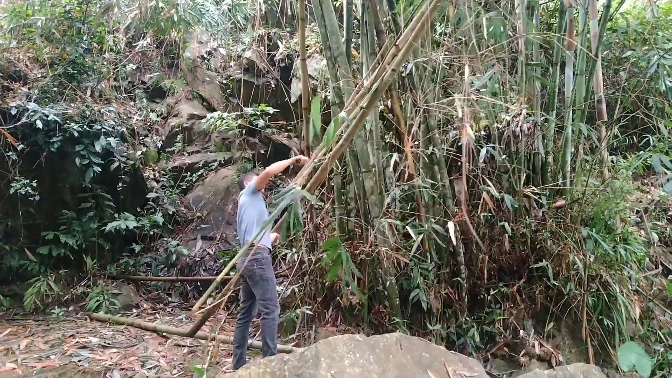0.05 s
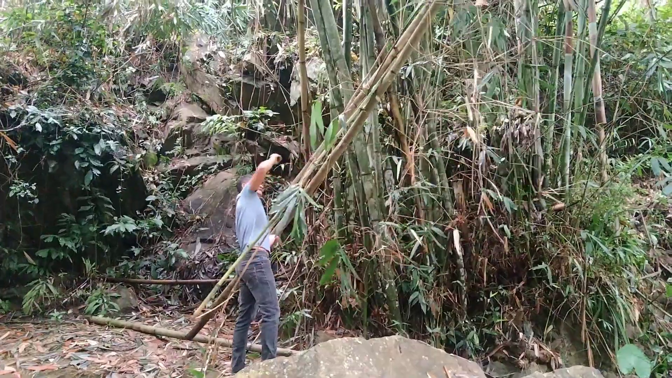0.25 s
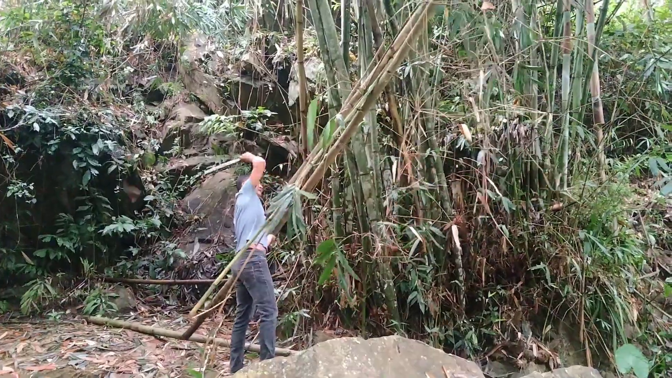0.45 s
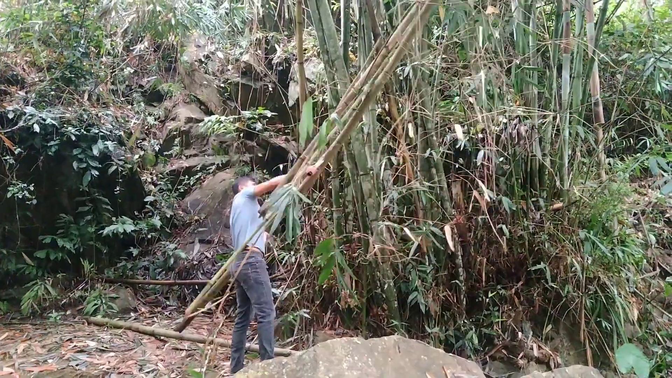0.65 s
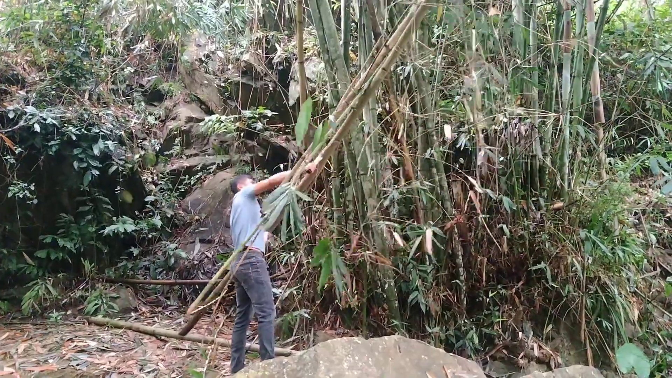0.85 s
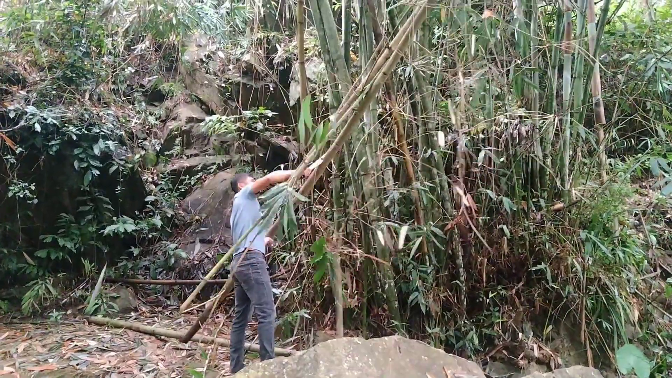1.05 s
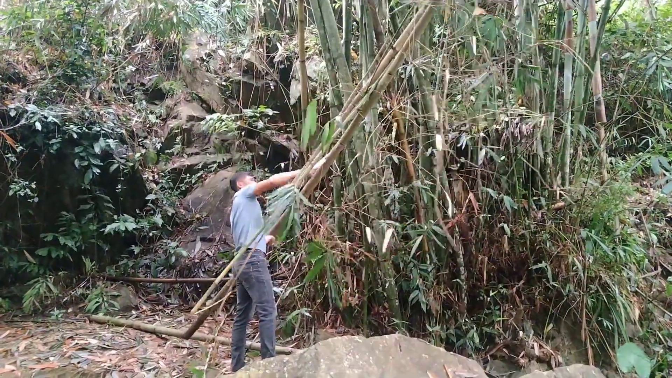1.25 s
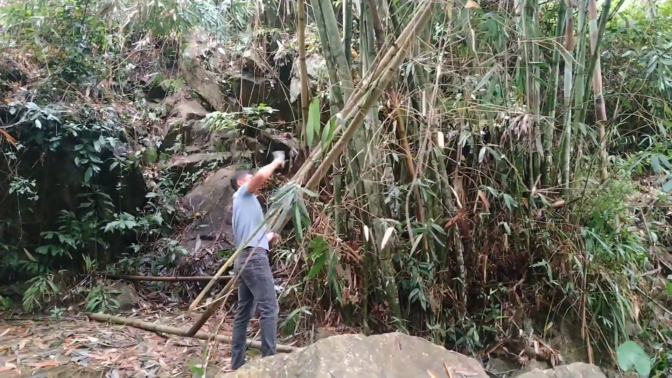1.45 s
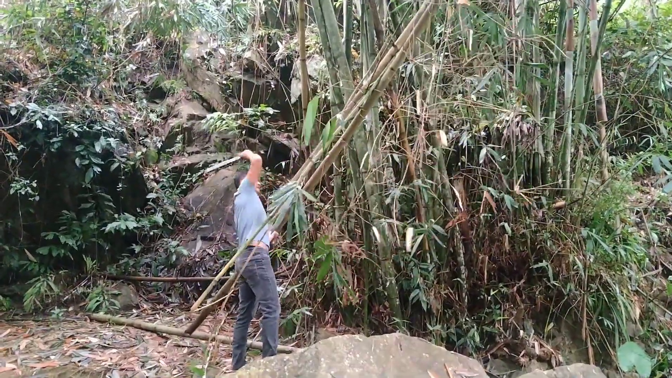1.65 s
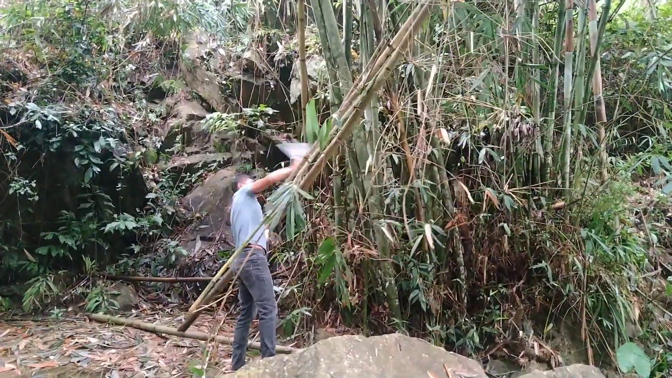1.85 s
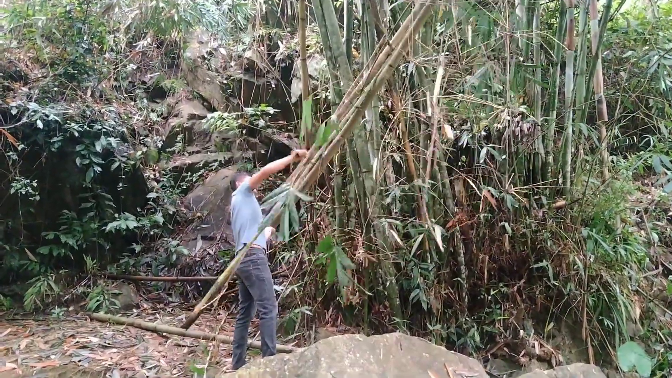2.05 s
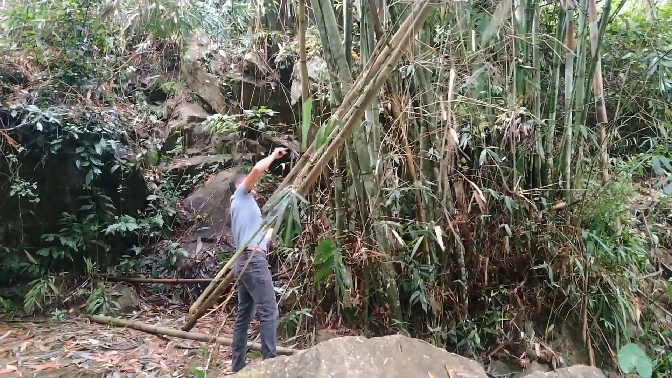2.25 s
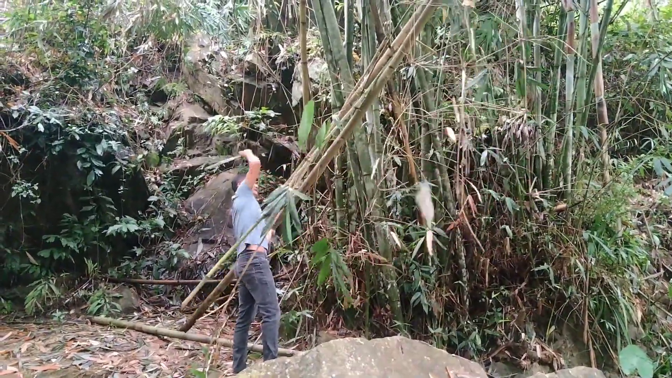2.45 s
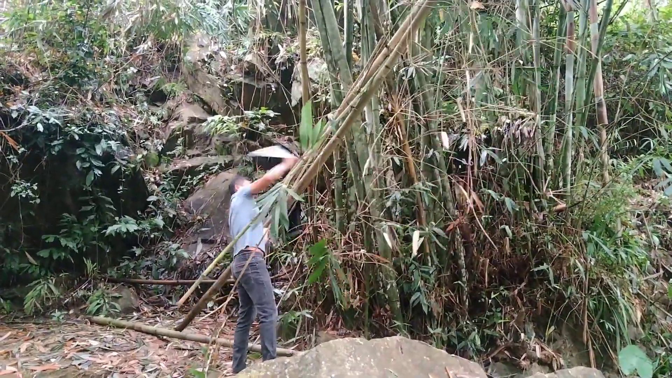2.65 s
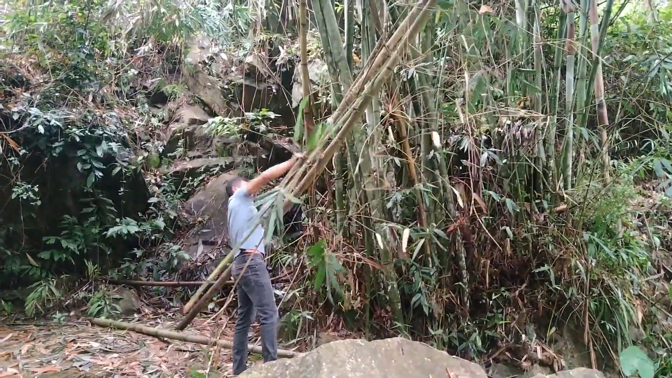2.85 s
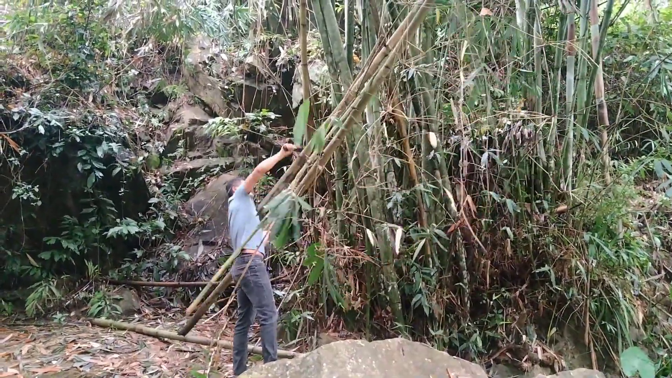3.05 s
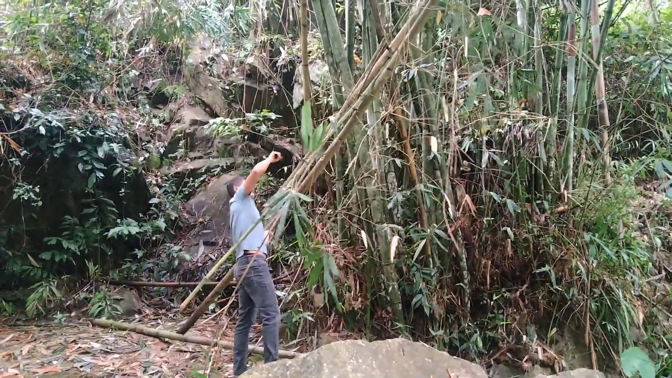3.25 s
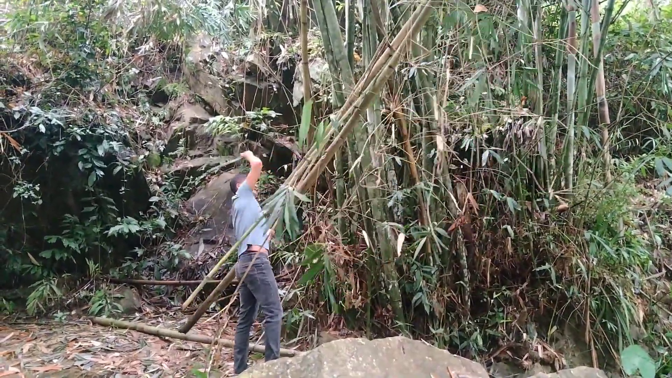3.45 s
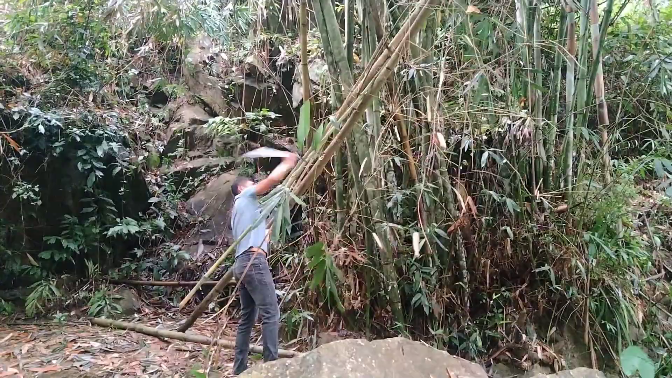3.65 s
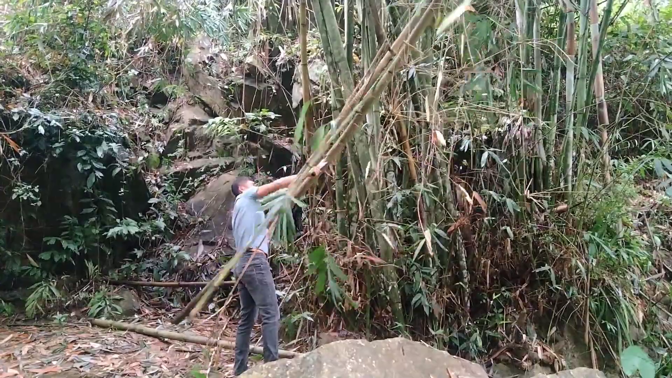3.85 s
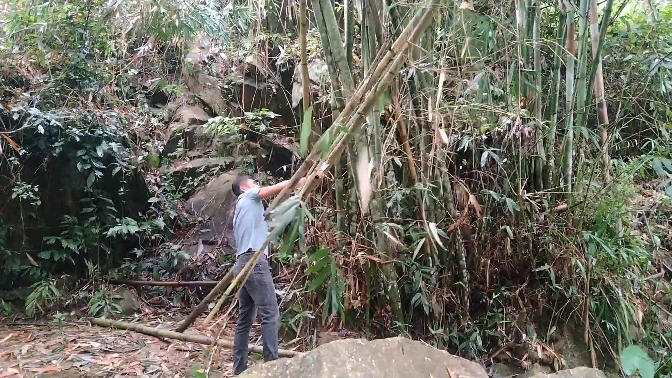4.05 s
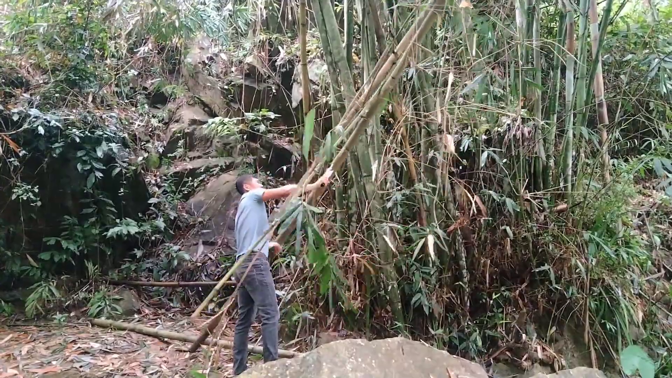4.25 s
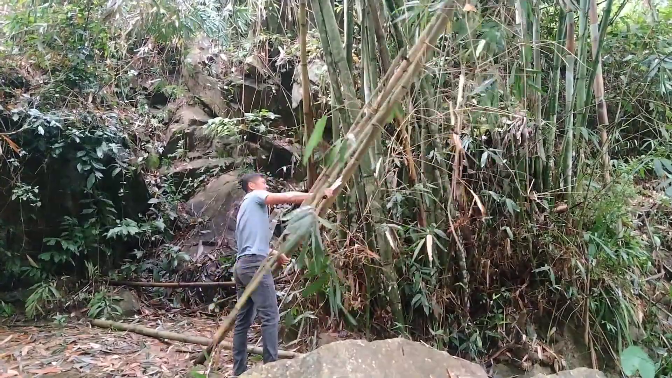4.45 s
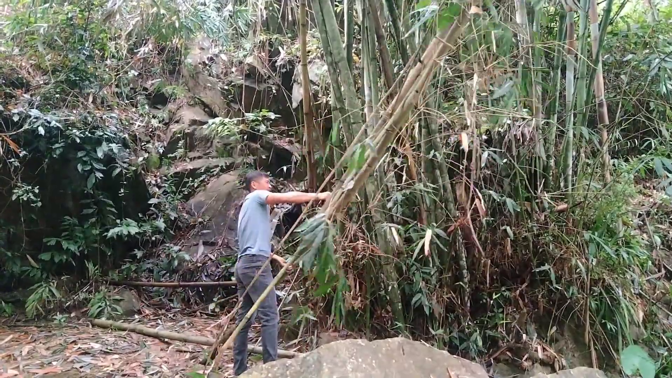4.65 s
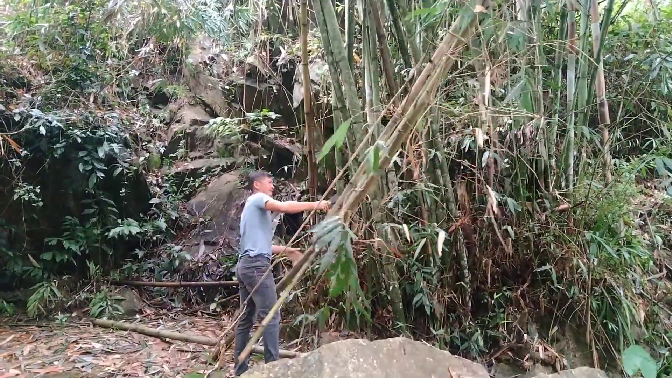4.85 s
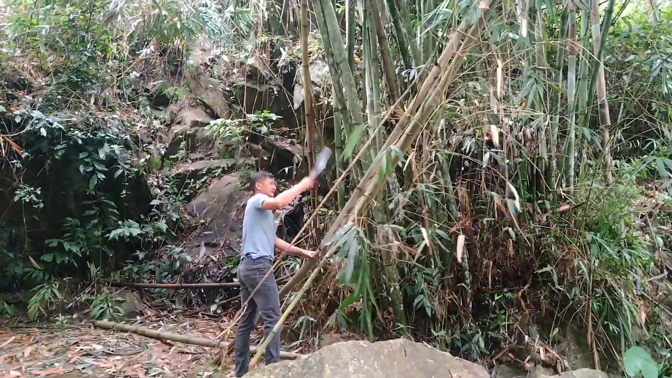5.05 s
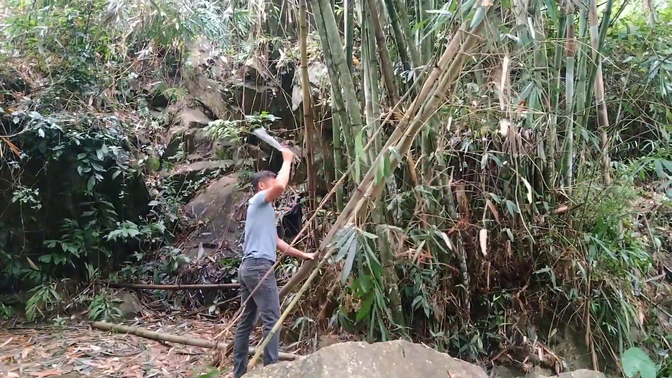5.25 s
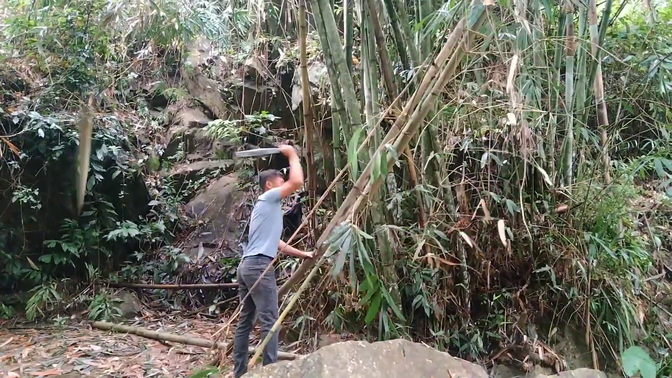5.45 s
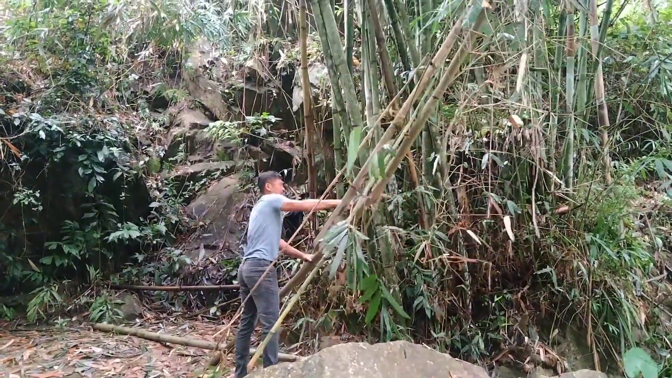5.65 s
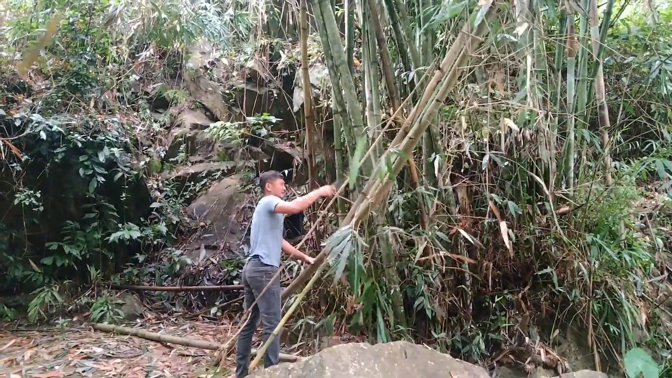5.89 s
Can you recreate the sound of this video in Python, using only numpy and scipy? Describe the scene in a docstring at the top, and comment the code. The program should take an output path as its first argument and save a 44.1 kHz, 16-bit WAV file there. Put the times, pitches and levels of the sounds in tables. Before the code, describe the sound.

A stream runs steadily and quietly throughout, a soft rush with tiny rising bubble tones. At about 0.8 s a machete bites a leaning bamboo pole: a sharp, dry crack of splitting fibres, a brief hollow woody ring, faint leaf crackle and a soft rebound against neighbouring poles. Loose canes knock lightly at 1.1 s. A second stroke at 2.0 s is shorter and higher in pitch, with a dull low thud and stronger leaf rustle. A fuller, knocking chop lands at 2.8 s. Two light steel clinks with tiny scrapes come near 3.4 s, then a brighter, thinner chop at 3.9 s. From 4.3 to 5.0 s poles rub and bump faintly. At 5.7 s two strokes fall almost together, a hollow double crack with rustling leaves. Short scattered echoes return from rock and grove, heard through a small outdoor microphone.

```python
"""A stream runs throughout: filtered noise for the rush, short rising tones for the bubbles.
From 0.8 s a machete chops a leaning bamboo pole: noise snaps for the splitting fibres, fading tones for the
hollow cane. Crackling leaves follow each stroke, then the pole swings back against its neighbours. Loose poles
knock and rub from 1.1 s, one stroke at 2 s has a dull thud, and the blade clinks twice near 3.4 s.
A rock face and the grove throw back the sounds of cane and steel."""
import sys
import numpy as np
from scipy import signal
from scipy.fft import rfft, irfft, next_fast_len
from scipy.io import wavfile
from scipy.ndimage import map_coordinates

SR = 44100
rng = np.random.default_rng(int(sys.argv[2]) if len(sys.argv) > 2 else 0)


def persist_wave(psi):
    """Save psi, clipped to +-1, as 16-bit WAV."""
    counts = np.round(np.clip(psi, -1, 1) * 32767).astype(np.int16)
    wavfile.write(sys.argv[1], SR, np.atleast_2d(counts).T)


N = 261072
T = np.arange(SR) / SR  # time within one event, which lasts at most 1 s


def amp(db):
    """Turn decibels into a gain."""
    return 10 ** (np.asarray(db) / 20)


def unit(x):
    """Scale to an rms of 1."""
    return x / np.sqrt(np.mean(x ** 2) + 1e-20)


def burst(x):
    """Scale to the energy of 50 ms of sound at an rms of 1."""
    return x * np.sqrt(SR / 20 / (np.sum(x ** 2) + 1e-20))


def along(points, hz):
    """Read a curve of (pitch_hz, value) points, with pitch on a log axis."""
    point_hz, value = np.transpose(points)
    return np.interp(np.log(hz + 1), np.log(point_hz), value)


def coloured(x, points):
    """Filter with the gains of (pitch_hz, gain_db) points, without any sound before its cause."""
    size = 2 * next_fast_len(len(x) // 2 + 4096)
    gain = amp(along(points, np.fft.rfftfreq(size, 1 / SR)))
    # Folding the cepstrum (the spectrum of the log gain) forward in time gives a minimum-phase filter.
    cepstrum = irfft(np.log(gain), size)
    cepstrum[1:size // 2] *= 2
    cepstrum[size // 2 + 1:] = 0
    response = np.exp(rfft(cepstrum))
    return irfft(rfft(x, size) * response, size)[:len(x)]


def wobble(rate):
    """Draw a smooth random curve with `rate` random points a second."""
    knots = rng.standard_normal(int(N * rate / SR) + 4)
    return map_coordinates(knots, [np.arange(N) * rate / SR])


def add(track, start_s, x):
    """Mix x into the track from start_s, cutting it at the track's end."""
    part = track[round(start_s * SR):][:len(x)]
    part += x[:len(part)]


def snaps(rate, hiss):
    """Tiny snaps of random size, about `rate` a second, plus a share of fine friction noise."""
    sparse = (rng.random(SR) < rate / SR) * rng.standard_normal(SR)
    return unit(unit(sparse) + hiss * rng.standard_normal(SR))


def ring(modes, pitch, weight, attack):
    """A struck body sounds several fading tones (modes), each with its own strength."""
    hz, db, t60 = np.transpose(modes)[:, :, None]
    phase = 2 * np.pi * (hz * pitch * T + rng.random(hz.shape))
    tones = amp(db - 60 * T / t60) * np.sin(phase)
    return burst(weight @ tones * (1 - np.exp(-T / attack)))


# how long the grove's echoes last: pitch_hz [Hz], time to fade by 60 dB t60_s [s]
GROVE_FADE = [(100, 0.45), (350, 0.21), (1400, 0.2), (5000, 0.4), (9000, 0.44), (15000, 0.056)]


def outdoors(x, near_db=-4, near_decay=0.013, rock_db=-7, rock_delay=0.027, rock_spread=0.021,
             grove_db=-5, far_db=-18, far_t60=1.8):
    """Add scatter from nearby poles, a smeared echo off the rock face and the tail of the grove."""
    hz, t, spectrum = signal.stft(rng.standard_normal(SR), SR, nperseg=256)
    near_fade = amp(-60 * t / along(GROVE_FADE, hz)[:, None])
    far_fade = amp(far_db - 60 * t / far_t60)
    tail = signal.istft(spectrum * (near_fade + far_fade), SR, nperseg=256)[1][:SR]
    grove = tail * (1 - np.exp(-T / 0.013))
    near = snaps(1500, 0.3) * np.exp(-T / near_decay)
    rock_shape = (T > rock_delay) * np.exp(-np.abs(T - rock_delay) / rock_spread)
    rock = snaps(1200, 0.46) * rock_shape
    echoes = [(near_db, near), (rock_db, rock), (grove_db, grove)]
    answer = sum(amp(db) * echo / np.linalg.norm(echo) for db, echo in echoes)
    return x + signal.fftconvolve(x, answer)[:SR]


def bubbles(count, centre_hz, spread, cycles, size_db):
    """Small bubbles: fading tones that rise in pitch as they reach the surface."""
    t = T[:SR // 40]  # each tone lasts at most 25 ms
    start = rng.integers(0, N, (count, 1))
    hz = np.clip(centre_hz * np.exp(spread * rng.standard_normal((count, 1))), 300, 9000)
    age = t * hz / cycles
    size = amp(size_db * rng.exponential(size=(count, 1)).clip(0, 4))
    envelope = size * np.exp(-age) * (1 - np.exp(-8 * age))
    rise = 1 + 0.0462 * np.minimum(age, 4)
    grains = envelope * np.sin(2 * np.pi * hz * t * rise)
    position = start + np.arange(len(t))
    return unit(np.bincount(position.ravel(), grains.ravel())[:N])


# tone colour of the rushing water: pitch_hz [Hz], level_db [dB per Hz]
WATER_COLOUR = [(25, -17), (60, -19.5), (105, -11), (200, -7), (700, -6.5), (1050, -7), (1420, -.5),
                (1750, -5), (2500, 1.5), (3500, -8.5), (5300, -14.5), (7400, -12), (11000, -37.5),
                (14000, -11.5)]
FLOW_DB = -40.0  # level of the rush


def stream():
    """Rushing water is filtered noise with slight wavering, under a babble of many bubbles."""
    rush = unit(coloured(rng.standard_normal(N), WATER_COLOUR)) * amp(0.63 * wobble(12))
    babble = bubbles(count=4000, centre_hz=1986, spread=0.3136, cycles=9.8, size_db=3.5)
    return amp(FLOW_DB) * (rush + amp(-8.0) * babble)


# tones of the hollow cane and its air: pitch_hz [Hz], level_db [dB], time to fade by 60 dB t60_s [s]
CANE_TONES = [(322, -6.5, 0.13), (391, -11.5, 0.14), (532.7, -8.5, 0.11), (681.6, -5, 0.092),
              (803, 4, 0.04), (1015, -1, 0.067), (1163, 0.5, 0.062), (1292, -1, 0.078), (1385, 7, 0.077),
              (1522, -6.5, 0.16), (2005, -9, 0.14), (2300, 7.5, 0.036), (2520, 1, 0.058), (2670, -18, 0.12),
              (3215, -11.5, 0.13), (4125, -14, 0.12)]
# tone colour of splitting fibres: pitch_hz [Hz], level_db [dB per Hz]
FIBRE_COLOUR = [(40, -48), (120, -21), (200, -5.5), (330, -6.5), (450, -2.5), (650, -6.5), (950, -3.5),
                (1350, 6), (1750, -2.5), (2450, 4.5), (3200, -5.5), (6500, -8.5), (10000, -21.5),
                (15500, -12)]


def culm_hit(force, attack, knock_db, hollow_db, clack_db, crack_db, ring_db, pitch):
    """Snaps sound through the cane and leave it ringing; the place of contact sets the colour."""
    crack = burst(coloured(force, FIBRE_COLOUR))
    weight = amp(2 * rng.standard_normal(len(CANE_TONES)))
    body = amp(ring_db) * ring(CANE_TONES, pitch, weight, attack)
    # (pitch_hz, gain_db)
    place = [(180, -2), (300, knock_db), (400, knock_db), (520, hollow_db), (650, hollow_db),
             (850, 1.5), (1200, -1), (1700, 0.7), (2300, clack_db), (2900, clack_db),
             (3800, crack_db), (7500, crack_db), (11000, min(crack_db, 0))]
    return outdoors(coloured(crack + body, place))


# blade strokes, also used for leaves and rebounds: start_s [s], level_db [dB], split_s (splitting time) [s],
# knock_db (low) [dB], hollow_db (middle) [dB], clack_db (high) [dB], pitch_factor of the cane [ratio],
# leaves_db [dB], swing_s (time until the pole swings back) [s]
BLADE_STROKES = [ (0.7672, -21.5, 0.0115, 0, -1, -2.5, 0.99, -40, 0.072),
                 (2.0238, -25, 0.0043, 0.5, 3, -2, 1.14, -31.5, 0.11),
                 (2.8468, -21.5, 0.0081, 5.5, 3, 4, 1.0, -33.5, 0.12),
                 (3.8646, -20.5, 0.0095, -5.5, 1.5, -2.5, 1.02, -32.5, 0.135),
                 (5.7338, -21.5, 0.017, -3, 9, -2, 0.95, -33, 0.11),
                 (5.7590, -22, 0.011, -3.5, 1.5, -1.5, 1.0, -31, 0.098)]
FIRM_DB, RING_DB = -21.5, -7  # level of a firm stroke, and of its ring beside its crack
RING_GROWTH = 1.3  # dB more ring per dB of force
CRACK_DB = -1  # treble setting shared by all strokes


def chops():
    """The edge bites, fibres part quickly until the blade sticks, and a few splinters last longer."""
    out = np.zeros(N)
    for start_s, db, split_s, knock_db, hollow_db, clack_db, pitch, *_ in BLADE_STROKES:
        bite = 2.38 * np.exp(-T / 0.001) * rng.standard_normal(SR)
        splitting = snaps(2500, 0.5) * np.exp(-(T / split_s) ** 4)
        splinters = 0.2 * snaps(500, 0.25) * np.exp(-T / 0.067)
        force = bite + splitting + splinters
        ring_db = RING_DB + RING_GROWTH * (db - FIRM_DB)
        hit = culm_hit(force, 0.0027, knock_db, hollow_db, clack_db, CRACK_DB, ring_db, pitch)
        add(out, start_s, amp(db) * hit)
    return out


LEAF_DELAY_S, LEAF_RISE_S, LEAF_SETTLE_S = 0.015, 0.01, 0.11  # foliage shaken by a stroke


def leaves():
    """Dry leaves rub and snap after each stroke: crackling noise that swells, then settles."""
    out = np.zeros(N)
    colour = [(300, -20), (1500, -31), (3000, 18.5), (7000, 1.5), (14000, -4)]  # (pitch_hz, gain_db)
    for start_s, *_, leaves_db, _ in BLADE_STROKES:
        rustle = unit(coloured(snaps(750, 1.0), colour))
        shape = (1 - np.exp(-T / LEAF_RISE_S)) * np.exp(-T / LEAF_SETTLE_S)
        add(out, start_s + LEAF_DELAY_S, amp(leaves_db) * rustle * shape)
    return out


# colour of cane on cane: hollow_db [dB], clack_db [dB], ring_db [dB], pitch_factor [ratio]
CANE_ON_CANE = (3.5, -0.5, -8, 1.15)
BUMP_DB, BUMP_KNOCK_DB = -40, 3  # a middling bump and its low knock
KNOCK_GROWTH = 1.1  # dB more knock per dB above a middling bump
BUMP_CRACK_DB, DULLING_DB_PER_S = 2, 330  # the longer the rub, the duller the contact


def bump(db, rub_s):
    """Poles slide together: a harder bump knocks deeper, a longer rub is softer at first and duller."""
    hollow_db, clack_db, ring_db, pitch = CANE_ON_CANE
    knock_db = BUMP_KNOCK_DB + KNOCK_GROWTH * max(db - BUMP_DB, 0)
    crack_db = BUMP_CRACK_DB - DULLING_DB_PER_S * rub_s
    attack = 0.16 * rub_s
    force = snaps(1500, 0.59) * (1 - np.exp(-T / attack)) * np.exp(-(T / rub_s) ** 2)
    return amp(db) * culm_hit(force, attack, knock_db, hollow_db, clack_db, crack_db, ring_db, pitch)


REBOUND_DB, SWING_LOSS_DB_PER_S, REBOUND_RUB_S = -27.5, 109, 0.013  # level before the loss over the swing


def rebounds():
    """The pole swings back into its neighbours; the longer the swing, the weaker the bump."""
    out = np.zeros(N)
    for start_s, *_, swing_s in BLADE_STROKES:
        db = REBOUND_DB - SWING_LOSS_DB_PER_S * swing_s
        add(out, start_s + swing_s, bump(db, REBOUND_RUB_S))
    return out


# loose poles knock and rub: start_s [s], level_db [dB], rub_s (rubbing time) [s]
POLE_KNOCKS = [ (1.110, -43, 0.036), (1.143, -38, 0.017), (2.044, -36, 0.018), (4.303, -43.5, 0.029),
               (4.462, -45.5, 0.027), (4.691, -43, 0.025), (4.823, -43.5, 0.013), (4.844, -43.5, 0.015),
               (5.009, -45.5, 0.02)]


def knocks():
    """The shaken poles slide and bump against one another."""
    out = np.zeros(N)
    for start_s, db, rub_s in POLE_KNOCKS:
        add(out, start_s, bump(db, rub_s))
    return out


# one dull thud: start_s [s], level_db (before its soft onset) [dB], length_s (time scale) [s]
DULL_THUD = (2.0240, -0.71, 0.0012)


def thud():
    """One stroke lands with a low push of air and its slower return."""
    start_s, db, length_s = DULL_THUD
    out = np.zeros(N)
    age = T / length_s
    push = (1 - age) * np.exp(-age) * (1 - np.exp(-T / 0.00016))
    add(out, start_s, -amp(db) * push)
    return out


# the flat of the blade touches a pole: start_s [s], level_db [dB], scrape_db [dB],
# place of contact along the blade [0-1]
BLADE_CLINKS = [(3.4268, -34.5, -3.5, 0.45), (3.4690, -37.5, 3, 0.32)]
# tones of the steel blade: pitch_hz [Hz], level_db [dB], time to fade by 60 dB t60_s [s]
STEEL_TONES = [(1245, -2, 0.19), (2396, 8, 0.061), (3640, 4, 0.045), (5060, -2, 0.031), (6160, -6, 0.028),
               (7700, -7, 0.03)]


def clinks():
    """Light touches let the steel ring, with a short scrape on the cane."""
    out = np.zeros(N)
    for start_s, db, scrape_db, place in BLADE_CLINKS:
        rubbing = snaps(4000, 0.33) * np.exp(-(T / 0.012) ** 2)
        scrape = burst(coloured(rubbing, FIBRE_COLOUR))
        # a tone touched at its still point (node) stays silent
        weight = np.sin(np.pi * place * np.arange(1, len(STEEL_TONES) + 1))
        steel = ring(STEEL_TONES, 1, weight, attack=0.00073)
        touch = steel + amp(scrape_db) * scrape
        add(out, start_s, amp(db) * outdoors(touch, near_db=-26, rock_db=-20, grove_db=-7.5))
    return out


def scene():
    """Mix the cutter's work over the sound of the stream."""
    cutting = chops() + leaves() + rebounds() + knocks() + thud() + clinks()
    return (stream() + cutting)[None]


# tone colour of the small microphone: pitch_hz [Hz], gain_db [dB]
MICROPHONE_COLOUR = [(22, -16), (45, -11), (75, 3.5), (120, 1), (7300, 0), (8300, 1.5), (9200, -4),
                     (9900, 1.5), (11200, -7.5), (13000, -2), (15500, -9)]
TOP_HZ = 15750  # nothing passes from here up


def record(dry):
    """A small microphone colours the sound, rounds off loud peaks and cuts the highest treble."""
    x = coloured(dry[0], MICROPHONE_COLOUR)
    x = x / (1 + np.abs(x / 0.75) ** 6) ** (1 / 6)  # peaks bend smoothly towards 0.75
    size = next_fast_len(N + SR // 2)
    passed = np.fft.rfftfreq(size, 1 / SR) < TOP_HZ
    return irfft(rfft(x, size) * passed, size)[None, :N]


dry = scene()
out = record(dry)
persist_wave(out)
```